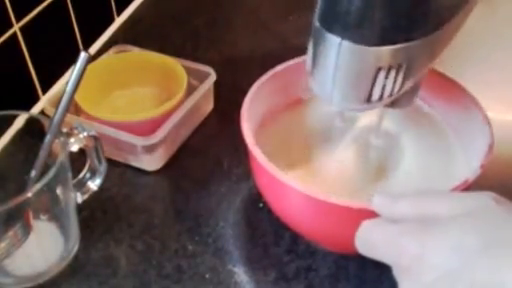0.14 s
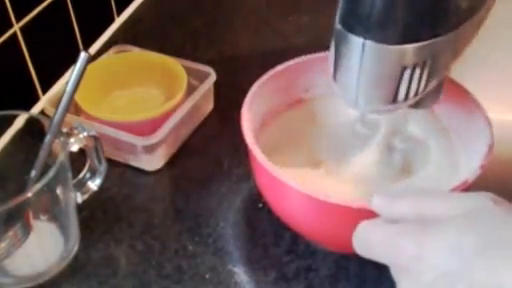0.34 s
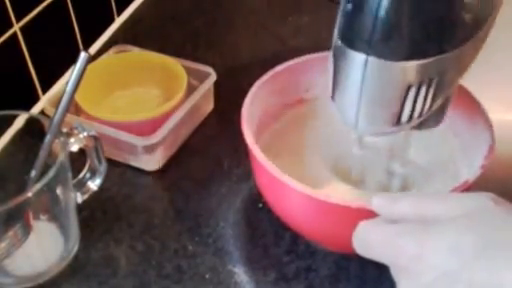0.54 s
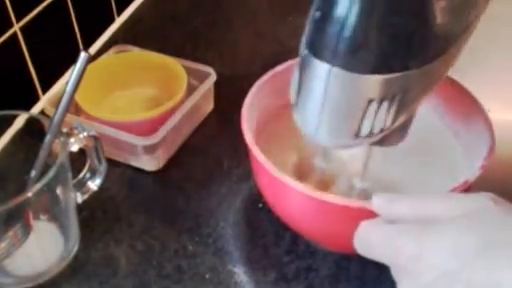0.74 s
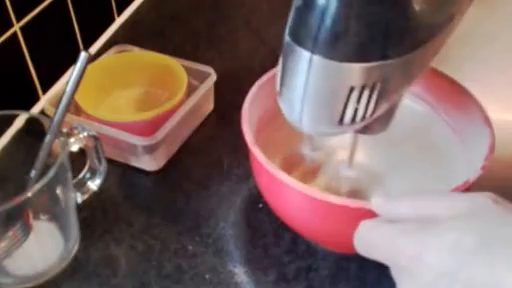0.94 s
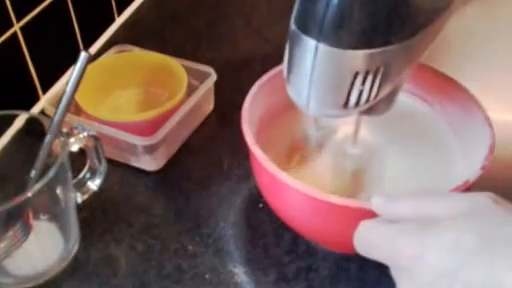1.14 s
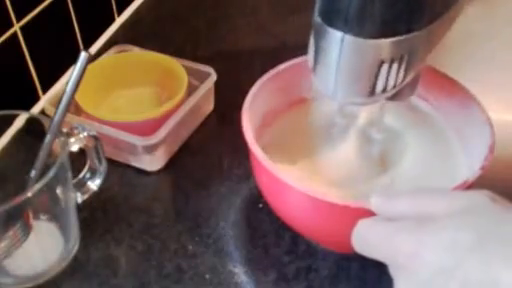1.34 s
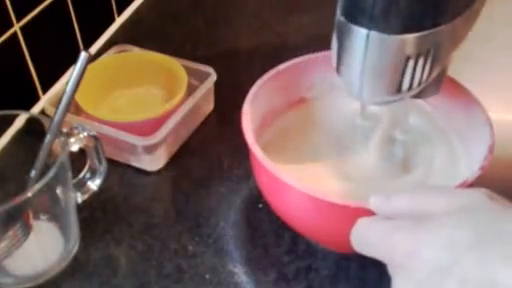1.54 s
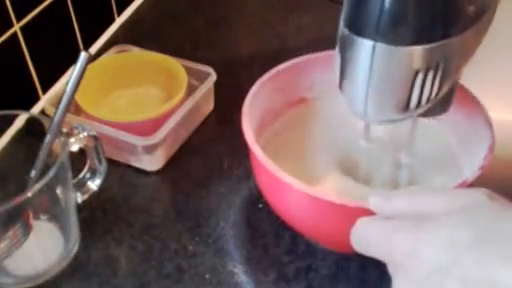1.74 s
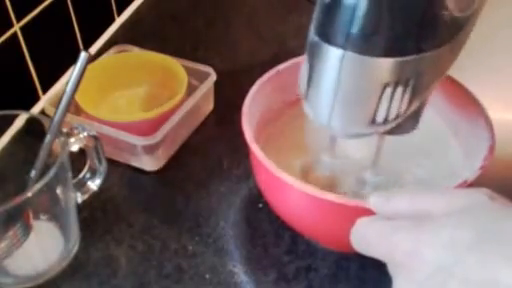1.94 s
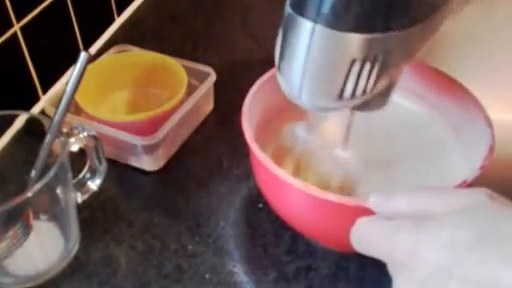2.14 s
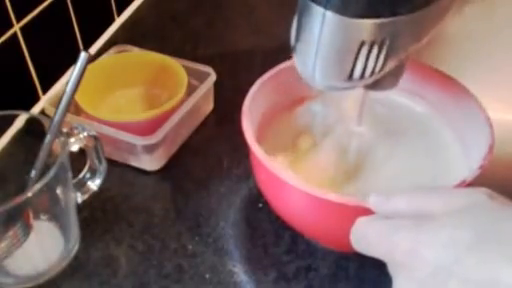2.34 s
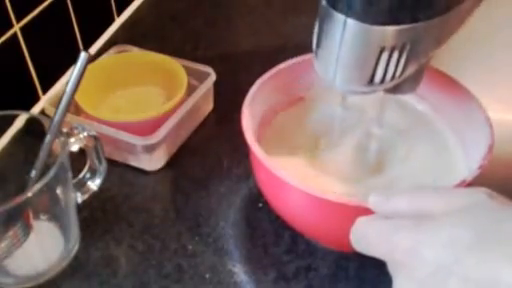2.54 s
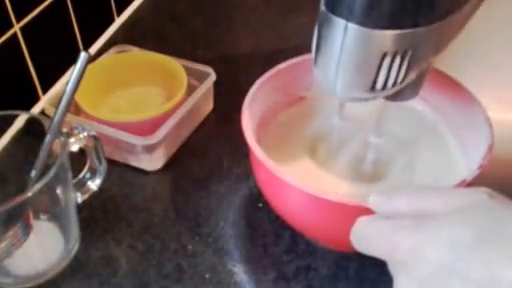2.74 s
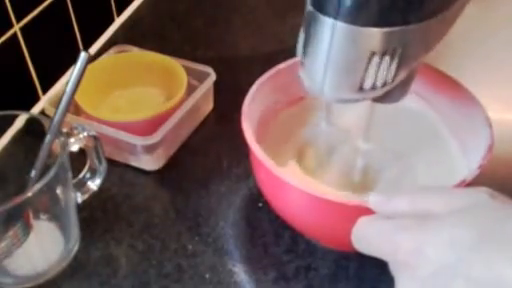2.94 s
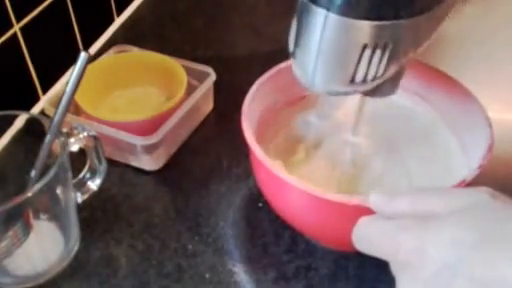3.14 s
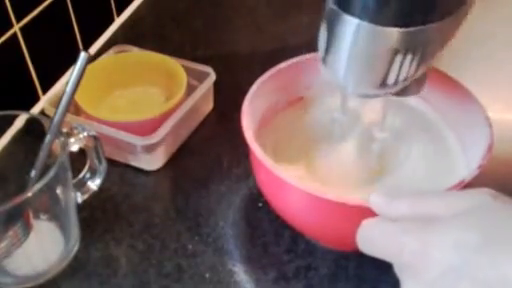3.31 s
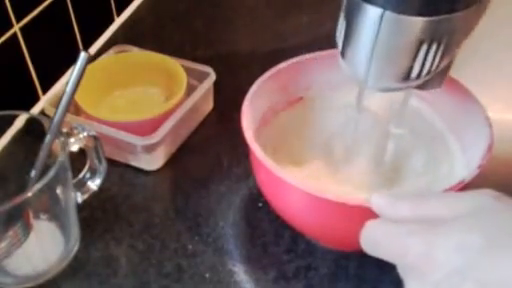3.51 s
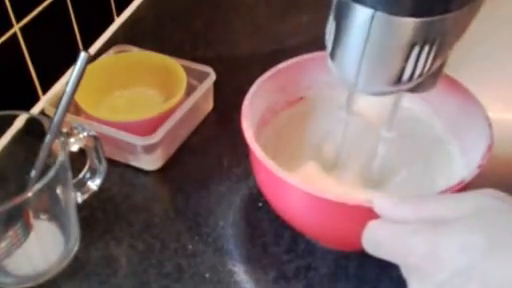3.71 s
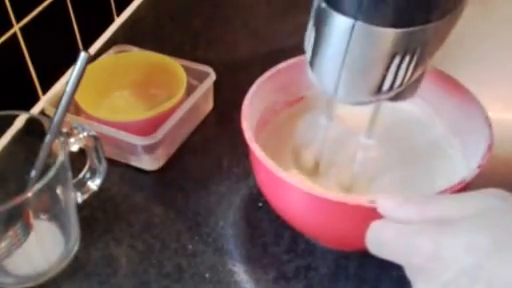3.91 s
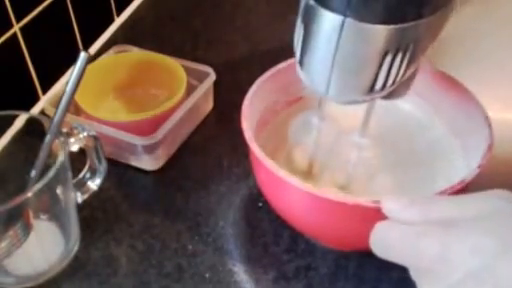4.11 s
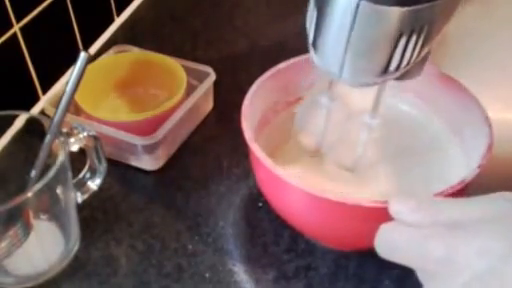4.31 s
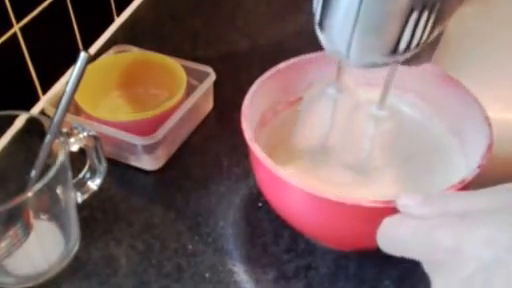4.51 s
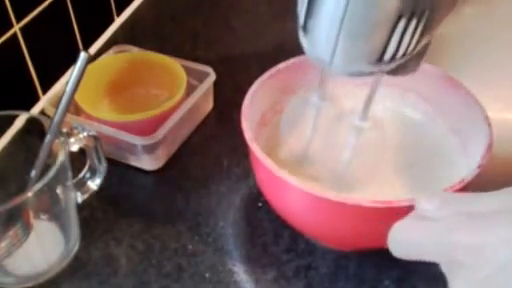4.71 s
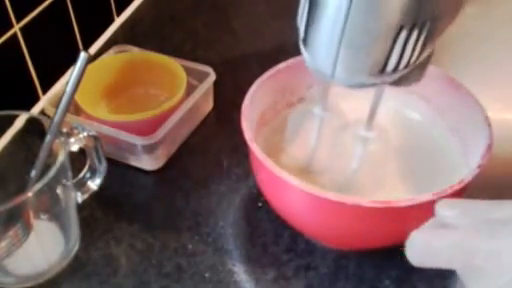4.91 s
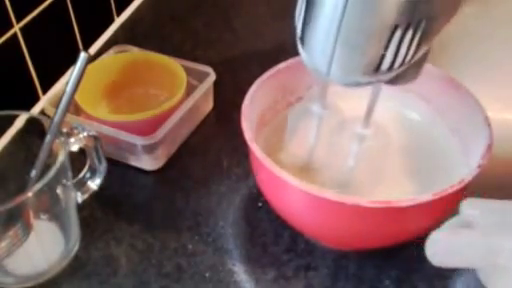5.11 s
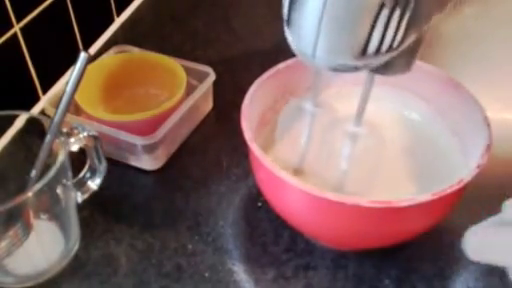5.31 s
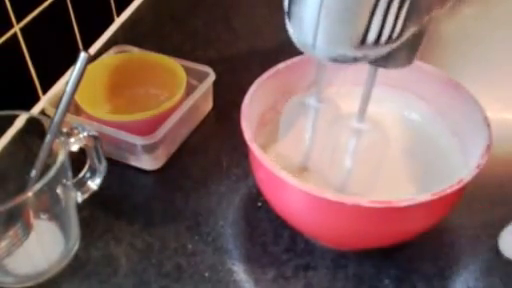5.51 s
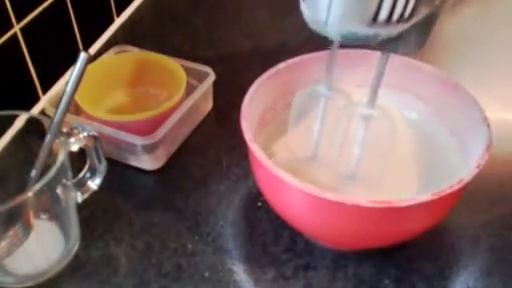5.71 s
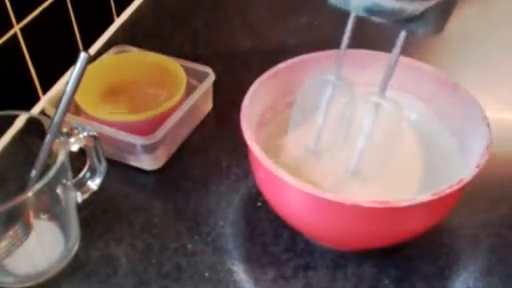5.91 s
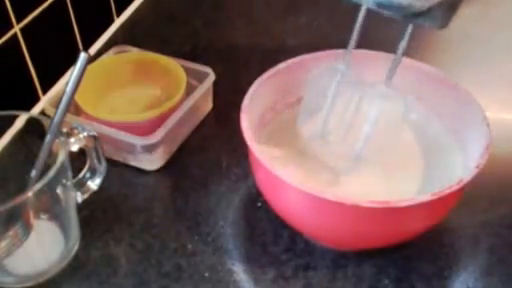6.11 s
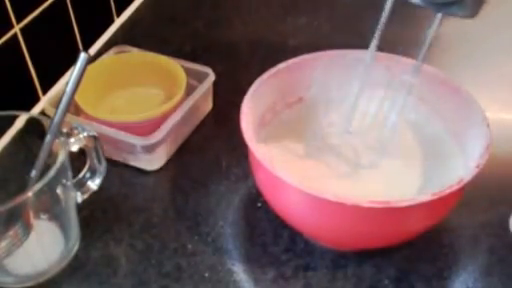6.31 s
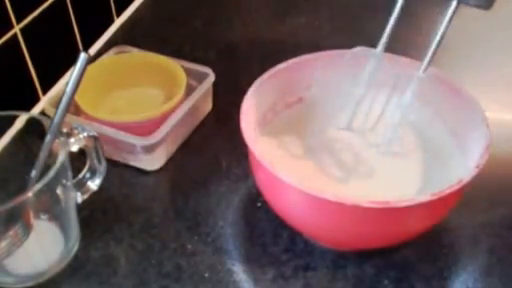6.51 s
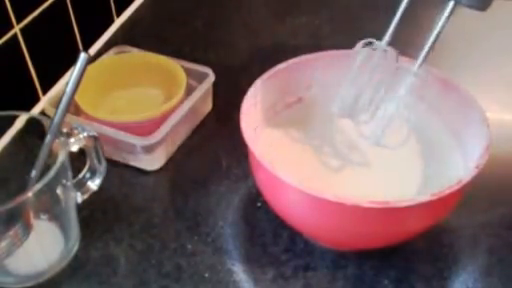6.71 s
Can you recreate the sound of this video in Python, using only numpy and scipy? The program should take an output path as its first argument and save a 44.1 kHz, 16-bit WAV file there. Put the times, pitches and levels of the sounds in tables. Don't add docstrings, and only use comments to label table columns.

```python
import sys
import numpy as np
from scipy import signal
from scipy.fft import rfft, irfft, next_fast_len
from scipy.io import wavfile
from scipy.ndimage import uniform_filter1d, map_coordinates

SR = 44100
rng = np.random.default_rng(int(sys.argv[2]) if len(sys.argv) > 2 else 0)


def undo_db(level):
    steps = np.asarray(level, float) / 20
    return 10 ** steps


def dump(signal):
    limited = np.clip(np.atleast_2d(signal).T, -1, 1)
    pcm = np.round(limited * 32767).astype(np.int16)
    wavfile.write(sys.argv[1], SR, pcm)


N = 297675

# time_s, level_db, away_db
ROAR = [(0, -18, 1), (.45, -18, 1.5), (.85, -17, 0.5), (1.15, -18, 1.5), (1.5, -18, 1), (2.08, -16.5, 0),
        (2.3, -17.5, 0.5), (2.76, -17.5, 0.5), (4.1, -17, 0), (4.7, -17, 0), (4.98, -19, 1.5),
        (5.24, -22, 1), (5.45, -27.5, 6), (5.85, -40, 11), (6.1, -43.5, 7.5), (6.35, -48.5, 8.5),
        (6.6, -48.5, -2), (6.75, -48.5, -1)]
# freq_hz, density_db
HOUSING_COLOUR = [(410, -49), (700, -9), (793, -11.5), (1170, -0.5), (1690, -4.5), (1920, 0.5), (2370, 1),
                  (2620, -1.5), (2930, -3), (3530, -9.5), (4640, -8.5), (5590, -14.5), (6100, -18.5),
                  (7160, -20), (13700, -49)]
# freq_hz, density_db
COASTING_COLOUR = [(410, -43), (700, -6), (909, -7), (1080, -0.5), (1370, -3.5), (1650, 1.5), (1870, 2.5),
                   (2230, -1.5), (2930, -12.5), (3270, -19.5), (4810, -19.5), (6100, -31.5), (6730, -30),
                   (9190, -43), (13700, -68)]
# ring_hz, width_hz, boost_db, start_s, stop_s
RINGS = [(1072, 28, 12, 3.5, 6.3), (1087, 30, 5, -1, .8), (1152, 30, 6, 5.7, 8), (1190, 60, 3, -1, 5),
         (1453, 30, 6, 4.3, 5.1), (1580, 60, 6, 6.2, 8), (1701, 30, 5, 5.2, 6.2), (1894, 30, 4, 4.6, 8),
         (1967, 30, 5, -1, 4), (2128, 30, 5, -1, 4.4), (2357, 25, 4, -1, 2.2), (2360, 25, 9, 3.8, 5.3),
         (2411, 25, 4, .5, 3.4), (2449, 25, 4, -1, 5), (2833, 40, 5, .3, 4.6), (2922, 30, 5, .3, 5.3),
         (3057, 30, 7, 6.1, 8), (4030, 50, 4, .5, 3), (4134, 60, 5, .7, 3.5), (4600, 120, 4, 1.8, 4.8),
         (4580, 160, 6.5, 3.7, 4.4), (2950, 90, 5, 5.1, 6), (5400, 80, 5, -1, 1.8), (5450, 90, 5, 2.8, 5)]
# time_s, speed_hz, hum_db
ROTOR = [(0.0, 313.4, -21.6), (0.42, 310.2, -24.5), (0.62, 312, -22.2), (1.25, 315, -20),
         (1.55, 315.8, -20.3), (2.08, 320.8, -19.2), (2.27, 323.4, -23.5), (2.42, 323.2, -22),
         (2.7, 320.3, -18.5), (3.2, 318.5, -18), (3.5, 315.1, -20), (3.76, 318.0, -18),
         (3.92, 313.2, -19.7), (4.2, 303.9, -27.5), (4.36, 295.5, -31.8), (4.5, 292.9, -37),
         (4.78, 290.6, -36.5)]
# multiple, level_db, start_s, stop_s
ORDERS = [(3, -25, -1, 4.8), (3, -16.5, 1.95, 2.8), (4, -19, -1, 4.6), (4, -8, 4.72, 5), (4, -19, 5, 5.2),
          (5, -22, -1, 5), (5, -16, 4.2, 5), (10, -22, -1, 5.4), (10, -16, 4.1, 5.1), (11, -26, -1, 5),
          (24, -37, -1, 4.9)]
# freq_hz, level_db
COUNTER = [(60, -100), (140, -72), (172, -56), (205, -51), (230, -43), (262, -33), (291, -35)]
# freq_hz, level_db
TWICE = [(200, -75), (292, -62), (310, -41), (345, -42), (410, -38), (480, -42), (545, -40), (595, -32),
         (630, -41)]
# centre_hz, width_hz, level_db
SHELL = [(1170, 120, -43), (1360, 150, -51), (1560, 220, -45), (1850, 140, -40), (2450, 350, -54),
         (2960, 250, -50), (3650, 350, -48), (4300, 300, -45), (4800, 300, -53), (5400, 400, -52),
         (7050, 350, -52)]
# peak_s, slosh_gain_db, half_length_s, rattle_gain_db
SWEEPS = [(0.0, 10, .05, 3), (0.38, 14, 0.22, 16.5), (0.86, 15, 0.3, 9), (0.994, 14, 0.17, 5),
          (1.35, 10, 0.28, 8), (1.594, 3, 0.24, 16), (1.67, 9, 0.23, 13), (1.913, 13, .07, 7),
          (2.15, 6, 0.25, -1), (3.15, 1, 0.083, -2), (3.57, -4.5, .06, 3), (4.2, -2, .15, -2),
          (5.05, -6.5, .2, -2)]
# freq_hz, density_db
CHURN_COLOUR = [(200, -35.5), (280, -9), (340, -3), (390, 1), (450, -2), (560, 0), (630, -1.5), (656, 10),
                (682, -10), (760, -8), (950, -11.5), (1100, -35.5)]
# freq_hz, density_db
SLOSH_COLOUR = [(25, -30), (80, -32), (110, -14), (170, -0.5), (240, 6.5), (300, 1), (400, -41)]
# freq_hz, density_db
KITCHEN_COLOUR = [(25, -40), (80, -38), (105, -12), (140, -4), (250, -41), (1000, -7.5), (2000, -24.5),
                  (5000, -5), (8000, -25), (14000, -34)]
# start_s, peak_db, ring_hz
KNOCKS = [
    (0.743, -17, 517),
    (0.8, -9, 496),
    (0.82, -7, 490),
    (0.846, -10, 476),
    (0.867, -2, 517),
    (0.902, -11, 486),
    (0.942, -4, 520),
    (1.006, -21, 530),
]
# start_s, peak_db, ring_hz
CLICKS = [
    (5.9539, -22, 1060),
    (6.0215, -25, 1050),
    (6.2205, -34, 1730),
    (6.2652, -33, 1730),
    (6.3959, -33, 1290),
    (6.454, -36, 1180),
    (6.549, -41, 1830),
    (6.6044, -34, 1675),
    (6.6887, -38, 1835),
]
# freq_hz, t60_s
TILES = [(300, 0.85), (2000, 0.36), (10000, 0.15)]
# time_s, limit_hz
TOP = [(0, 12700), (.7, 13300), (.8, 13950), (2.5, 13950), (2.8, 13650), (3.3, 13500), (3.5, 13900),
       (5.3, 13900), (5.7, 13100), (6.75, 13100)]

OFF_S, DRAG_PER_S, FRICTION_HZ_PER_S = 4.778, .435, 76.2
DEEP_DB, BRIGHT_DB = -5, -4
DEEP_AWAY, BRIGHT_AWAY = 1.1, .6
BRIGHT_LOSS_DB = 3
BAR_DB, BAR_BELOW_HZ = (-1, 1, -3), (300, 160, 105)
LIFT_OFF_HZ, TICK_POWER = 42, .6
CHURN_DB, SLOSH_DB = -29.5, -57
CHURN_POWER, SLOSH_POWER = 1.31, 0.43
SWEEP_CHURN = 0.32
DEEP_CHURN_HZ, DEEP_CHURN_POWER = 400, 1
RATTLE_HZ, RATTLE_WIDTH_HZ, RATTLE_DB = 1490, 320, -35.5
WALL_DB = -5


def along(points, hz):
    f, v = np.transpose(points)
    return np.interp(np.log(hz + 1), np.log(f + 1), v)


def curves(rows):
    s, *cols = np.transpose(rows)
    return [np.interp(np.arange(N) / SR, s, c) for c in cols]


def unit(x):
    return x / np.sqrt(np.mean(x ** 2) + 1e-20)


def steady(x):
    return x / np.sqrt(uniform_filter1d(x ** 2, size=SR // 2))


def wobble(rate):
    knots = rng.standard_normal(int(N * rate / SR) + 4)
    return map_coordinates(knots, [np.arange(N) * rate / SR])


def between(t, start, stop, fade):
    return np.clip(np.minimum(t - start, stop - t) / fade + .5, 0, 1)


def filtered(x, response):
    m = next_fast_len(N + 8192)
    return irfft(rfft(x, m) * response(np.fft.rfftfreq(m, 1 / SR)), m)[:N]


def coloured(x, points):
    return filtered(x, lambda hz: undo_db(along(points, hz)))


def lowpass(x, cutoff_hz):
    return filtered(x, lambda hz: 1 / (1 + (hz / cutoff_hz) ** 8))


def resonance(hz, centre_hz, width_hz):
    return 1 / (1 + (2 * (hz - centre_hz) / width_hz) ** 2)


def drift(shape, bins, frames):
    field = uniform_filter1d(rng.standard_normal(shape), size=bins, axis=0)
    return unit(uniform_filter1d(field, size=frames, axis=1))


def patchy(patchy_db):
    z = signal.stft(rng.standard_normal(N), nperseg=512)[2]
    gain_db = patchy_db * drift(z.shape, bins=4, frames=20)
    return signal.istft(z * undo_db(gain_db), nperseg=512)[1][:N]


def speed():
    held_hz, rest_hz = curves(ROTOR)[0], FRICTION_HZ_PER_S / DRAG_PER_S
    coasted_s = np.maximum(np.arange(N) / SR - OFF_S, 0)
    return (held_hz + rest_hz) * np.exp(-DRAG_PER_S * coasted_s) - rest_hz


def reflections(x, ripple_db):
    hz, t, z = signal.stft(x, SR, nperseg=4096, noverlap=3072)
    gain_db = ripple_db * drift(z.shape, bins=3, frames=40)
    for ring_hz, width_hz, boost_db, start_s, stop_s in RINGS:
        present = between(t, start_s, stop_s, fade=0.76)
        gain_db += boost_db * resonance(hz[:, None], ring_hz, width_hz) * present
    return signal.istft(z * undo_db(gain_db), SR, nperseg=4096, noverlap=3072)[1][:N]


def walls(x):
    hz, t, z = signal.stft(rng.standard_normal(SR // 2), SR, nperseg=256)
    decay_db = -60 * t / along(TILES, hz)[:, None]
    tail = signal.istft(z * undo_db(decay_db), SR, nperseg=256)[1]
    led_in = np.pad(x, (SR // 2, 0), "reflect")
    wet = signal.fftconvolve(led_in, tail / np.linalg.norm(tail))[SR // 2:][:N]
    return (x + undo_db(WALL_DB) * wet) / np.sqrt(1 + undo_db(2 * WALL_DB))


def roar():
    level_db, away_db = curves(ROAR)
    deep_db = DEEP_DB + DEEP_AWAY * away_db + .5 * wobble(1.93)
    bright_db = BRIGHT_DB + BRIGHT_AWAY * away_db + 0.55 * wobble(1.59)
    flutter = undo_db(.6 * wobble(60) + 1 * wobble(700))
    source = reflections(flutter * patchy(patchy_db=.5), ripple_db=2.2)
    fast = unit(coloured(source, HOUSING_COLOUR))
    slow = unit(coloured(source, COASTING_COLOUR))
    driven = np.clip((speed() - 200) / 90, 0, 1)
    bright_db = bright_db - BRIGHT_LOSS_DB * (1 - driven)
    air = driven * fast + (1 - driven) * slow
    deep = lowpass(air, 1500)
    bright = air - lowpass(air, 3300)
    middle = air - deep - bright
    mix = steady(middle) + undo_db(deep_db) * steady(deep) + undo_db(bright_db) * steady(bright)
    return undo_db(level_db - 0.74) * mix


def rotor():
    t, hz, roar_db = np.arange(N) / SR, speed(), curves(ROAR)[0]
    off = between(t, OFF_S, 8, fade=.1)
    turn = 2 * np.pi * np.cumsum(hz) / SR

    def tone(multiple, db, waver_db, rate):
        level = np.sqrt(2) * undo_db(db + waver_db * wobble(rate))
        return level * np.sin(multiple * turn + .15 * waver_db * wobble(rate))

    once_db = (1 - off) * curves(ROTOR)[1] + off * along(COUNTER, hz)
    hum = tone(1, once_db, waver_db=1.1, rate=25)
    hum += tone(2, along(TWICE, 2 * hz), waver_db=5.5 - 3.5 * off, rate=13)

    whine = np.zeros(N)
    for multiple, db, start_s, stop_s in ORDERS:
        order = tone(multiple, db + roar_db, waver_db=3 - 2 * off, rate=10)
        whine += between(t, start_s, stop_s, fade=.2) * order

    ticks = np.zeros(N)
    for k, (db, below_hz) in enumerate(zip(BAR_DB, BAR_BELOW_HZ)):
        multiple = 24 * (k + 1)
        heard = np.clip(np.minimum((below_hz - hz) / 15, (hz - LIFT_OFF_HZ) / 6), 0, 1)
        heard = heard * (hz / 75) ** TICK_POWER
        shell = sum(undo_db(shell_db) * resonance(multiple * hz, c, w) for c, w, shell_db in SHELL)
        ticks += heard * shell * tone(multiple, db, waver_db=2, rate=40)
    worn = 1 + .7 * np.cos(turn)
    return hum + whine + walls(worn * ticks)


def batter():
    t, pace_db = np.arange(N) / SR, 20 * np.log10(speed() / 315)
    sweep_gains, rattle_gains = [], []
    for peak_s, slosh_gain_db, half_s, rattle_gain_db in SWEEPS:
        shape = np.clip(1 - np.abs(t - peak_s) / half_s, 0, 1)
        sweep_gains.append(slosh_gain_db * shape)
        rattle_gains.append(rattle_gain_db * shape)
    sweep_db = np.max(sweep_gains, axis=0)
    rattle_db = RATTLE_DB + 3 * pace_db + np.max(rattle_gains, axis=0)
    churn_db = CHURN_DB + CHURN_POWER * np.maximum(pace_db, -15) + SWEEP_CHURN * sweep_db + 1.16 * wobble(9)
    slosh_db = SLOSH_DB + SLOSH_POWER * pace_db + sweep_db + 1.2 * wobble(6)

    churn = unit(coloured(undo_db(0.22 * wobble(35)) * patchy(patchy_db=-0.5), CHURN_COLOUR))
    bottom = lowpass(churn, DEEP_CHURN_HZ)
    churn = churn - bottom * (1 - undo_db(DEEP_CHURN_POWER * np.maximum(pace_db, -9)))
    slosh = unit(coloured(undo_db(2.3 * wobble(18)) * rng.standard_normal(N), SLOSH_COLOUR))
    scrape = undo_db(3.3 * wobble(40)) * rng.standard_normal(N)
    rattle = unit(filtered(scrape, lambda hz: resonance(hz, RATTLE_HZ, RATTLE_WIDTH_HZ)))
    return undo_db(rattle_db) * rattle + undo_db(churn_db) * churn + undo_db(slosh_db) * slosh


def kitchen():
    air = unit(coloured(rng.standard_normal(N), KITCHEN_COLOUR))
    hum = np.sin(2 * np.pi * 199.3 * np.arange(N) / SR + .2 * wobble(5))
    return undo_db(-51.0) * air + undo_db(-58) * hum


def strikes(events, t60_s, rise_s, gain_db):
    out, t = np.zeros(N + SR), np.arange(SR // 10) / SR
    for start_s, peak_db, ring_hz in events:
        envelope = undo_db(peak_db + gain_db - 60 * t / t60_s) * (1 - np.exp(-t / rise_s))
        out[round(start_s * SR):][:len(t)] += envelope * np.sin(2 * np.pi * ring_hz * t)
    return out[:N]


def scene():
    hits = strikes(KNOCKS, t60_s=.045, rise_s=.003, gain_db=-1)
    hits += strikes(CLICKS, t60_s=.025, rise_s=.0006, gain_db=-3)
    return (roar() + batter() + walls(hits) + rotor() + kitchen())[None]


def band_limit(x):
    return signal.sosfilt(signal.butter(12, 13830, fs=SR, output="sos"), x)


def record(dry):
    soft = dry[0] / (1 + np.abs(dry[0] / .99) ** 5) ** (1 / 5)
    thin = filtered(soft, lambda hz: 1j * hz / (60 + 1j * hz))
    hz, t, z = signal.stft(thin, SR, nperseg=2048)
    blocks = rng.exponential(size=(129, len(t) // 3 + 1))
    luck = np.kron(blocks, np.ones((8, 3)))[:len(hz), :len(t)]
    starved_hz = 1500 * np.clip(20 * np.linalg.norm(z, axis=0), 0, 1)
    limit_hz = np.interp(t, *np.transpose(TOP)) - starved_hz * np.maximum(luck ** .6 - .55, 0)
    trimmed = signal.istft(z * (hz[:, None] < limit_hz), SR, nperseg=2048)[1][:N]
    return band_limit(trimmed[None] - .0005)


dry = scene()
out = record(dry)
dump(out)
```